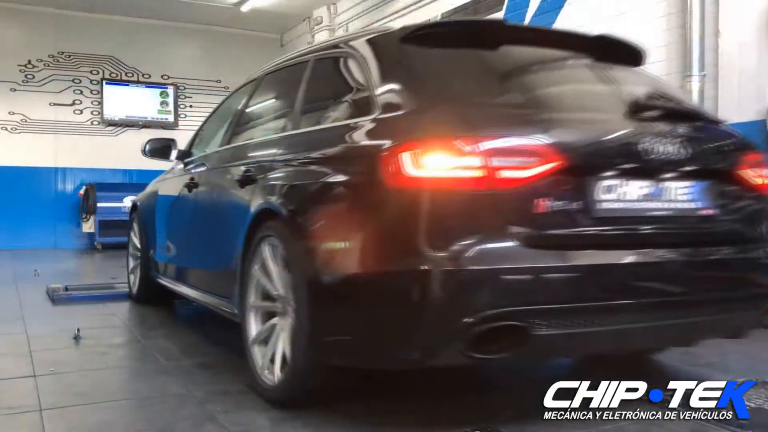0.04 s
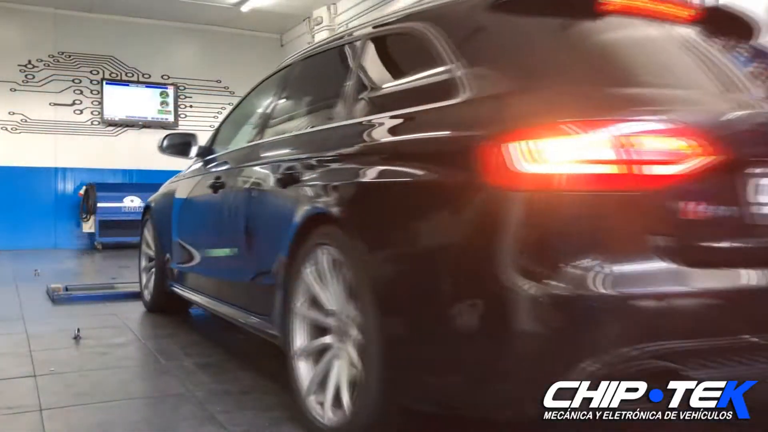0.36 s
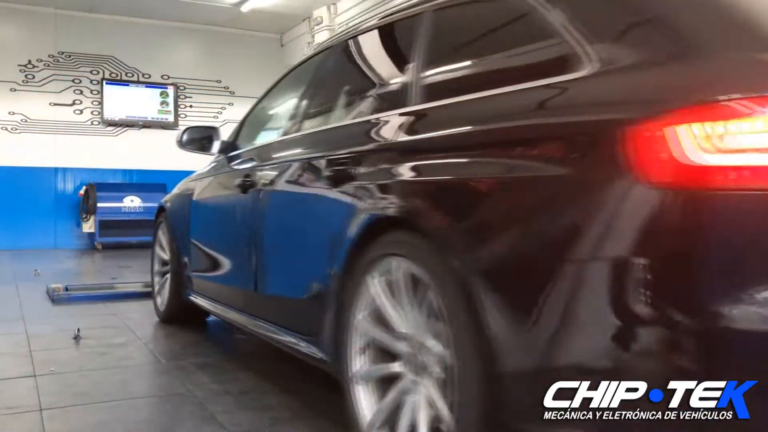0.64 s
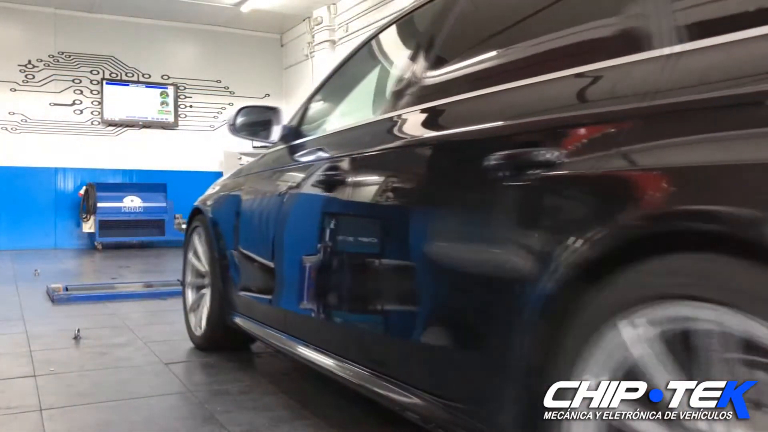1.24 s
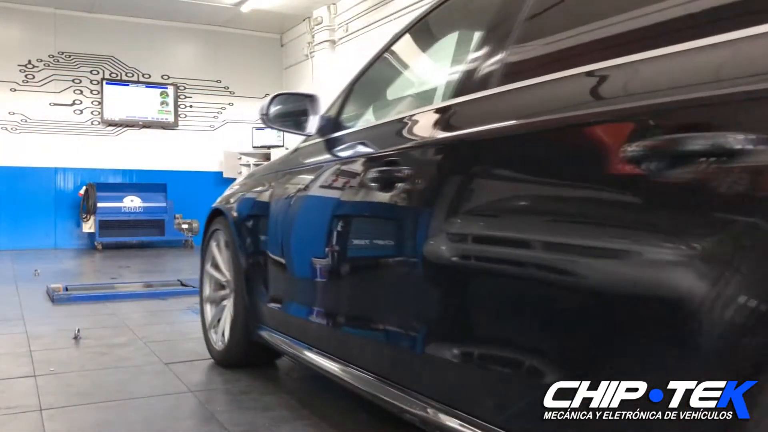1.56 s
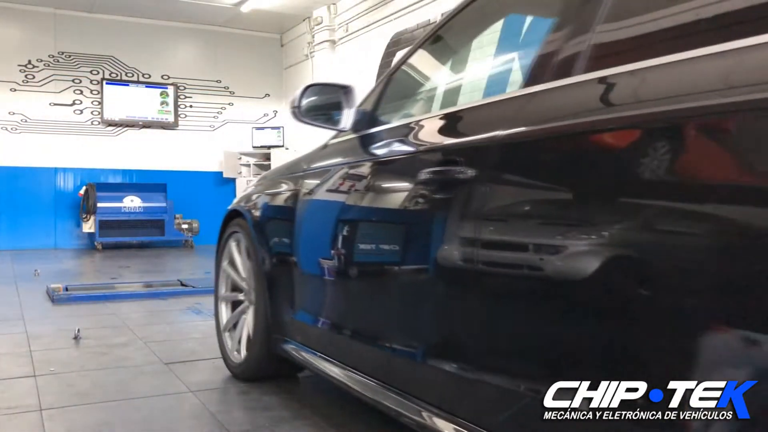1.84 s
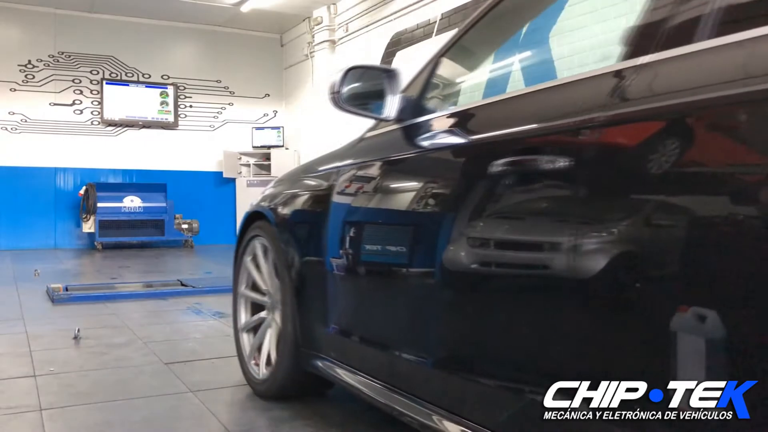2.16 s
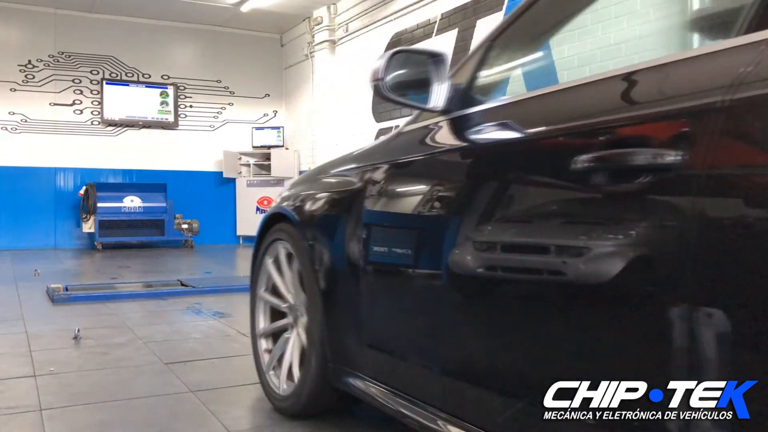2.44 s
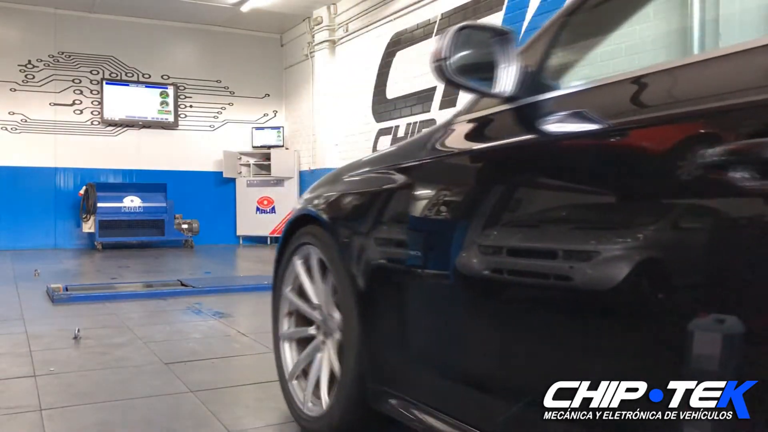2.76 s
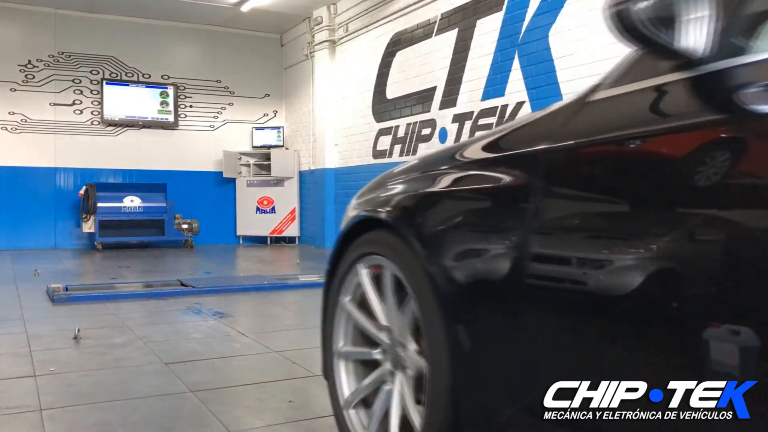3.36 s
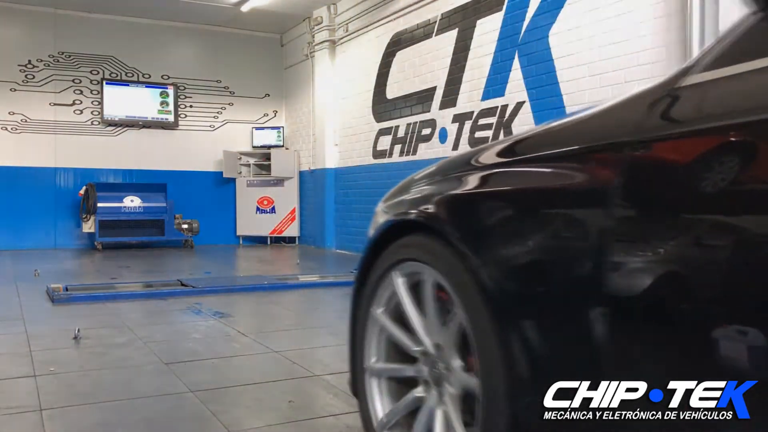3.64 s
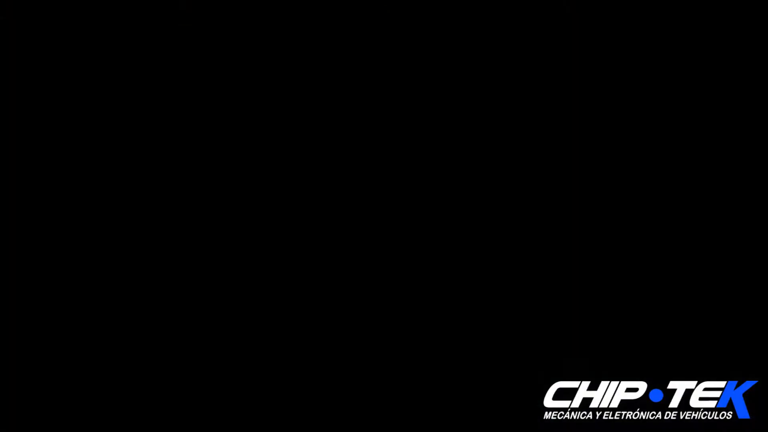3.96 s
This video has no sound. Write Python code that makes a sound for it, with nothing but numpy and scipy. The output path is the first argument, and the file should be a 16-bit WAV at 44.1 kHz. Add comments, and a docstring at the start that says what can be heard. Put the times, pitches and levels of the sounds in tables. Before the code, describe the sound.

A deep car engine rumbles in a tiled workshop, revving gently and settling to idle with a faint whir and ticking. Its tyres tip loose steel plates, which clank and ring through the hall twice loudly, then once more softly.

```python
"""A V8 car reverses slowly through a tiled workshop: the revs rise, sink to idle and lift again.
Its uneven firings boom out of the exhaust while fan, belts and tyres whir and the injectors tick.
Grit snaps under a tyre, then the wheels tip loose steel floor plates, which clatter, clink and
ring through the hall. The loudest peaks overload the microphone."""
import sys
import numpy as np
from scipy import signal
from scipy.fft import rfft, irfft
from scipy.io import wavfile
from scipy.ndimage import uniform_filter1d

SR = 44100
rng = np.random.default_rng(int(sys.argv[2]) if len(sys.argv) > 2 else 0)


def wrap_up_sound(samples):
    """Save the sound to the file named by the first command line argument, as 16-bit audio."""
    columns = np.atleast_2d(samples).T
    # keep every value between -1 and 1, then stretch to whole-number steps
    tamed = np.clip(columns, -1, 1)
    steps = np.round(tamed * 32767).astype(np.int16)
    wavfile.write(sys.argv[1], SR, steps)


N = 176400
T = np.arange(N) / SR
HZ = np.maximum(np.arange(N // 2 + 1) * SR / N, 1e-3)
CYLINDERS = 8

# The revs and the balance of the orders (multiples of the engine cycle rate; 8 is the firing tone):
# time_s, firing_hz, order_5_db, order_8_db, order_11_db, order_13_db, order_16_db, other_orders_db
ENGINE = [(0, 69.95, -37, -5, -16.5, -37, -26, -17.5), (0.12, 76.64, -17, -8.5, -13, -22, -20.5, -13.5),
          (0.25, 83.64, -11.5, -7, -22, -47, -31.5, -17), (0.38, 85.9, -14, -14, -34, -50, -24, -25),
          (0.5, 88.7, -10.5, -30, -26, -29, -29.5, -15.5), (0.65, 92.2, -24, -31, -41, -27.5, -28, -29.5),
          (0.8, 91.25, -24.5, -33.5, -43.5, -27.5, -33.5, -27.5),
          (1.05, 87.94, -27, -36.5, -33, -42, -27.5, -29), (1.28, 82.5, -22.5, -24, -26.5, -64, -38, -34.5),
          (1.6, 75.4, -34, -21.5, -24.5, -27.5, -46, -25.5), (1.85, 68.5, -45, -15, -31, -30.5, -27.5, -26),
          (2.03, 62.24, -45, -15.5, -52, -16.5, -31, -29), (2.27, 55.13, -84, -17.5, -34, -32, -38, -31),
          (2.52, 49.03, -59, -26, -28.5, -28.5, -25, -33), (3, 48.59, -60, -62, -29.5, -26.5, -20, -25),
          (3.4, 49.48, -55, -31, -27.5, -38, -23.5, -23.5), (3.64, 49.1, -46, -34, -25, -51.5, -30, -22.5),
          (3.74, 55.43, -58, -18.5, -39, -48, -20, -16), (4, 55.76, -45, -18, -32, -38, -20, -19.5)]


def undb(db):
    """Decibels to gain."""
    return 10 ** (np.asarray(db) / 20)


def curve(rows, column=1):
    """One column of a time table at every sample."""
    rows = np.array(rows)
    return np.interp(T, rows[:, 0], rows[:, column])


def unit(x):
    """Scale to rms 1."""
    return x / np.sqrt(np.mean(x ** 2))


def burst(x):
    """Scale to energy 1."""
    return x / np.sqrt(np.sum(x ** 2))


def fade(t60_s):
    """Exponential decay, 60 dB down after t60_s."""
    return np.exp(-np.log(1000) * np.minimum(T / t60_s, 10))


def attack(rise_s):
    """Exponential rise from 0 towards 1."""
    return 1 - np.exp(-T / rise_s)


def noise():
    """White noise."""
    return rng.standard_normal(N)


def on_log(rows, hz):
    """Read a table along a log frequency axis."""
    rows = np.array(rows)
    return np.interp(np.log(hz), np.log(rows[:, 0]), rows[:, 1])


def colour(x, eq):
    """Shape a sound with an EQ curve, at rms 1."""
    return unit(irfft(rfft(x) * undb(on_log(eq, HZ)), N))


def resonate(x, hz, width_hz):
    """Ring a sound through the same resonance twice."""
    peak = signal.iirpeak(hz, hz / width_hz, fs=SR)
    return signal.lfilter(*peak, signal.lfilter(*peak, x))


def delay(x, start_s):
    """Start a sound at a given time."""
    return np.concatenate([np.zeros(int(start_s * SR)), x])[:N]


def walk(rate_hz):
    """Smooth random wander at rms 1."""
    hold = int(SR / rate_hz)
    steps = np.repeat(rng.standard_normal(256)[:N // hold + 1], hold)
    return unit(uniform_filter1d(uniform_filter1d(steps, hold), hold)[:N])


def exhaust(cycle):
    """Uneven firings boom on multiples of the engine cycle; gas puffs with each firing."""
    # The orders that carry the boom, as in ENGINE: order
    strong_orders = (5, 8, 11, 13, 16)
    # The burble between them, ahead of the silencer: order, level_db
    other_orders = [(3, 2), (6, -0.5), (7, -1.5), (9, -16), (10, -4), (12, -14.5), (15, -5.5), (18, -4),
                    (19, -6), (21, -18.5), (24, -4), (27, -7)]
    # Envelope of the gas rush: time_s, level_db
    gas_level = [(0, -18), (.2, -25), (.42, -25), (1.0, -30.5), (1.6, -29), (2.4, -34), (3.6, -31.5),
                 (3.75, -30.5), (4, -33.5)]
    # Its bass-heavy EQ: frequency_hz, gain_db
    gas_eq = [(20, -60), (38, -49), (54, 0.5), (100, 0), (165, 4), (200, -8), (250, -4.5), (450, -21),
              (1200, -31.5), (4000, -38.5), (15000, -48.5)]

    def tone(order, roughness):
        """One order, wavering in level and phase."""
        angle = 2 * np.pi * (order * cycle + rng.random())
        wavering = (1 + roughness * walk(10)) * np.cos(angle)
        return np.sqrt(2) * (wavering + roughness * walk(11) * np.sin(angle))

    def silencer(hz, low_hz=33.5, top_hz=190):
        """Gain of the silencer, which passes a band of bass."""
        return 1 / np.sqrt(1 + (low_hz / hz) ** 10 + (hz / top_hz) ** 6)

    boom = sum(undb(curve(ENGINE, column) + 0.48) * tone(order, roughness=0.1)
               for column, order in enumerate(strong_orders, start=2))
    cycle_hz = curve(ENGINE) / CYLINDERS
    burble = sum(undb(db) * tone(order, roughness=0.19) * silencer(order * cycle_hz)
                 for order, db in other_orders)
    burble = unit(burble) * undb(curve(ENGINE, column=-1) - 1.5)
    puffs = 1 + 0.31 * np.cos(2 * np.pi * CYLINDERS * cycle)
    gas = colour(noise() * puffs, gas_eq) * undb(curve(gas_level))
    return boom + burble + gas


def engine_bay(cycle):
    """Fan, belts and tyres whir; injectors tick unevenly, once a firing, blurred by the hall."""
    # Resonances of an injector tick: pitch_hz, width_hz, drive_db
    tick_rings = [(4092, 450, 3.5), (6500, 750, 2.5), (7380, 337, 4.5), (7830, 320, 7), (8700, 2300, -4.5),
                  (11300, 3000, -12.5)]
    # Envelope of the ticking: time_s, level_db
    tick_level = [(0, -65), (1.0, -56), (2.4, -49.5), (4, -46.5)]
    # EQ of the whir: frequency_hz, gain_db
    whir_eq = [(150, -2.5), (300, -19.5), (450, 1), (700, -5), (1050, -1.5), (1500, -5), (2800, -8.5),
               (5200, -14), (7600, -18), (9000, -20), (12000, -33.5), (15500, -92)]
    # Envelope of the whir: time_s, level_db
    whir_level = [(0, -34), (.4, -37.5), (1.3, -37), (2.4, -40.5), (3.0, -41), (4, -40.5)]
    slip_firings, scatter_db, decay_s, hall_db = 0.13, 7, 0.009, -5
    firing = CYLINDERS * cycle + slip_firings * walk(40)
    tick_index = firing.astype(int)
    age_s = (firing % 1) / curve(ENGINE)
    ticks = 0
    for hz, width_hz, db in tick_rings:
        snap = noise() * np.exp(-age_s / decay_s)
        strength = undb(db + scatter_db * np.tanh(noise()[tick_index]))  # new for every tick
        ticks = ticks + resonate(snap * strength, hz, width_hz)
    ticks = unit(ticks) + undb(hall_db) * unit(hall(ticks))
    whir = colour(noise(), whir_eq) * undb(curve(whir_level) + 0.5 * walk(12))
    return whir + unit(ticks) * undb(curve(tick_level))


def grit():
    """Grit under a tyre gives one dry, bright tick."""
    # EQ of the tick: frequency_hz, gain_db
    grit_eq = [(600, -15), (1800, 5), (5000, 2), (8000, -12), (12000, -7), (15500, -14)]
    tick = burst(colour(noise(), grit_eq) * fade(t60_s=0.034))
    return undb(-5) * delay(tick, start_s=0.265)


def plate_ring(modes, thud_db, rattle_s):
    """A plate's modes build as it rattles; high ones die sooner, low ones follow the thud's strength."""
    t60_at_1khz_s, damping, detune, low_edge_hz = 0.17, 0.63, 0.00026, 450
    ring = 0
    for hz, db in modes:
        tuned_hz = hz * (1 + detune * rng.standard_normal())
        mode = np.sin(2 * np.pi * (tuned_hz * T + rng.random()))
        envelope = attack(rattle_s / 2) * fade(t60_at_1khz_s * (1000 / hz) ** damping)
        weight_db = thud_db + 1.5 if hz < low_edge_hz else 0
        ring = ring + undb(db + weight_db) * burst(mode * envelope)
    return burst(ring)


def plates():
    """Each wheel blow is a first contact and a dying rattle; the steel plate crashes, rings and thuds."""
    # The rear wheel rolls "onto" a plate, makes it "tip" and "drop"; then the "front" wheel arrives:
    # start_s, spot, level_db, treble_edge_hz, rise_s, rattle_s, thud_db (relative to the blow)
    blows = [(0.457, "onto", -7, 1890, 0.0028, 0.099, -5), (0.48, "onto", -10, 4500, 0.0048, 0.025, 3.5),
             (0.503, "onto", 2, 3380, 0.0058, 0.028, -3.5), (0.539, "onto", -1.5, 3340, 0.0028, 0.11, -1.5),
             (1.574, "tip", -3.5, 3982, 0.0093, 0.078, -10), (1.615, "tip", -0.5, 4670, 0.0029, 0.019, -9),
             (1.638, "tip", -3, 3500, 0.0021, 0.019, -4.5), (1.75, "drop", 2, 5800, 0.0016, 0.0092, -1.5),
             (1.766, "drop", 2, 1600, 0.0021, 0.025, -1), (1.97, "drop", -6, 850, 0.0021, 0.051, 0.5),
             (2.011, "drop", -13, 1094, 0.017, 0.1, 4), (2.991, "front", -16, 1204, 0.0036, 0.035, -3),
             (3.026, "front", -12, 940, 0.011, 0.12, 1), (3.154, "front", -10.5, 7100, 0.0025, 0.012, -2),
             (3.179, "front", -13, 1500, 0.0027, 0.028, -4),
             (3.296, "front", -21, 4500, 0.0025, 0.017, -1.5), (3.679, "front", -34, 500, 0.0017, 0.017, 8)]
    # The modes that ring at each struck spot: pitch_hz, level_db
    modes_at = { "onto": [(253, 1.5), (345, -4.5), (592, -3), (665, -1.5), (915, -1), (1030, 1), (1165, -8),
                (1335, 1), (1776, -15), (1980, -3), (2270, -7)], "tip": [(237, 8), (361, 2), (900, -14),
                (1034, 6), (1120, 2), (1205, 0), (1500, -19), (1615, -6), (2020, -5), (2178, -15),
                (2600, -2.5), (2710, -3), (2830, -3), (4505, -13)], "drop": [(237, -1.5), (305, -8),
                (358, -1), (727, -5), (902, -1), (1088, -2), (1310, -22), (1465, -3.5), (1626, -17)],
                "front": [(240, 0), (743, -1), (1120, -4), (1270, -2), (1520, -2), (2950, -10),
                (3770, -5.5), (4160, -8)]}
    # EQ of the steel crash: frequency_hz, gain_db
    crash_eq = [(130, -43), (250, -10), (360, -10), (520, -10), (750, 2.5), (1150, 1), (1700, 0),
                (2300, -6), (2800, -5.5), (3600, -9.5), (5500, -23), (9000, -24.5), (15000, -47)]
    # EQ of the deep thud: frequency_hz, gain_db
    thud_eq = [(90, -4.5), (200, -25), (235, -0.5), (300, -3.5), (365, -7), (510, -8), (850, -15),
               (1500, -41), (5000, -56)]
    plate_db, ring_db, rattle_db, rattles_per_s = 16.5, -3, -1.5, 1000
    out = np.zeros(N)
    for start_s, spot, db, edge_hz, rise_s, rattle_s, thud_db in blows:
        rattle = (rng.random(N) < rattles_per_s / SR) * noise()
        rattle *= attack(0.0015) * np.exp(-np.minimum(T / rattle_s, 20))
        contacts = undb(rattle_db) * burst(rattle)
        contacts[0] += 1  # the first contact
        ring = undb(ring_db) * plate_ring(modes_at[spot], thud_db, rattle_s)
        # countless short modes blur into a crash that swells with each contact
        energy = signal.fftconvolve(contacts ** 2, fade(t60_s=0.066) ** 2)[:N]
        crash = burst(colour(noise(), crash_eq) * np.sqrt(np.abs(energy)) * attack(rise_s))
        clank = signal.lfilter(*signal.butter(1, edge_hz, fs=SR), crash + ring)
        thud = burst(colour(noise(), thud_eq) * attack(rise_s) * fade(t60_s=0.087))
        out += undb(plate_db + db) * delay(clank + undb(thud_db) * thud, start_s)
    return out


def clinks():
    """Plate edges and small steel parts ring thin and high."""
    # One clink a row: start_s, pitch_hz, width_hz, level_db, t60_s
    strikes = [(.521, 8981, 3000, -19, 0.091), (.535, 7800, 940, -8, 0.084), (.552, 7266, 450, -11, 0.53),
               (.536, 10300, 5700, -15, 0.17), (1.752, 3770, 700, 5.5, 0.085),
               (3.157, 3820, 1500, -2.5, 0.068)]
    out = np.zeros(N)
    for start_s, hz, width_hz, db, t60_s in strikes:
        ring = burst(resonate(noise() * fade(t60_s), hz, width_hz))
        out += undb(db) * delay(ring, start_s)
    return out


def hall(x):
    """Diffuse reverb of the tiled hall; the mids hang on longest."""
    # Reverb time across the spectrum: frequency_hz, t60_s
    decay_times = [(150, 0.36), (500, 1.0), (1200, 0.88), (3000, 0.57), (7000, 0.67), (15000, 0.81)]
    octaves_hz = 125 * 2. ** np.arange(8)
    spectrum, tail = rfft(noise()), 0
    for hz, share in zip(octaves_hz, np.eye(len(octaves_hz))):
        band = irfft(spectrum * np.interp(np.log(HZ), np.log(octaves_hz), share), N)
        tail = tail + band * fade(on_log(decay_times, hz))
    build = attack(rise_s=0.011)
    response = tail * build / np.sqrt(np.sum((build * fade(1)) ** 2))
    return signal.fftconvolve(x, response[:SR])[:N]


def scene():
    """The running car and the grit, with plates and clinks echoing in the hall, in mono."""
    firing_hz = curve(ENGINE) * (1 + 0.0022 * walk(8.9))  # the revs wobble slightly
    cycle = np.cumsum(firing_hz) / SR / CYLINDERS  # engine cycles turned so far
    steel = plates() + clinks()
    mix = exhaust(cycle) + engine_bay(cycle) + steel + undb(-4.5) * hall(steel) + grit()
    return mix[None]


def record(dry):
    """The microphone drops the deepest bass and rounds the loudest peaks; the top is cut."""
    low_cut_hz, top_hz, ceiling, knee, end_fade_s = 36, 15750, 1.2, 9.8, 0.004
    lean = irfft(rfft(dry) / np.sqrt(1 + (low_cut_hz / np.maximum(HZ, 1)) ** 16), N)
    rounded = lean / (1 + np.abs(lean / ceiling) ** knee) ** (1 / knee)
    end_ramps = np.minimum(np.minimum(T, T[::-1]) / end_fade_s, 1)
    faded = rounded * np.sin(np.pi / 2 * end_ramps) ** 2
    return signal.sosfilt(signal.ellip(10, 0.1, 80, top_hz, fs=SR, output="sos"), faded)


dry = scene()
out = record(dry)
wrap_up_sound(out)
```